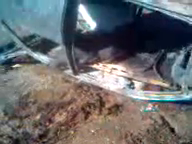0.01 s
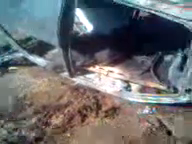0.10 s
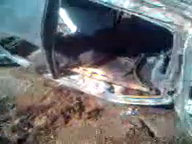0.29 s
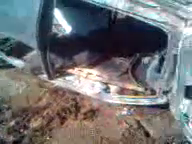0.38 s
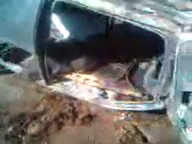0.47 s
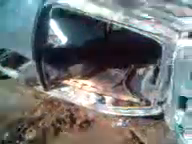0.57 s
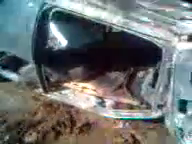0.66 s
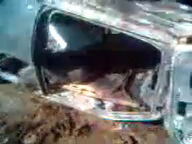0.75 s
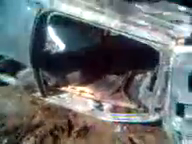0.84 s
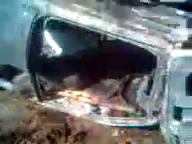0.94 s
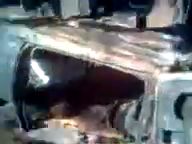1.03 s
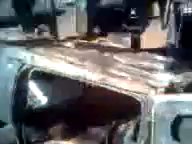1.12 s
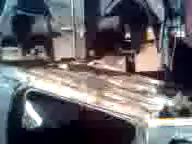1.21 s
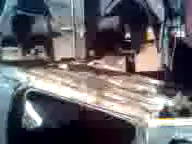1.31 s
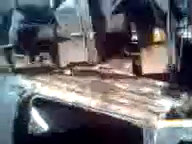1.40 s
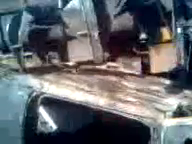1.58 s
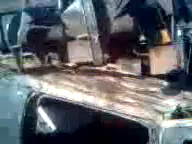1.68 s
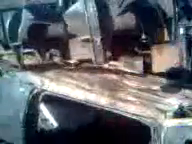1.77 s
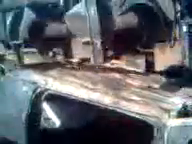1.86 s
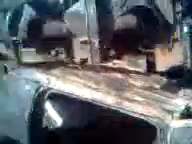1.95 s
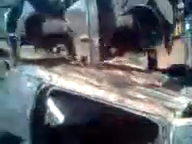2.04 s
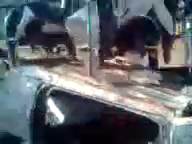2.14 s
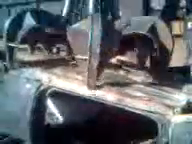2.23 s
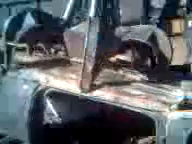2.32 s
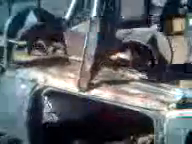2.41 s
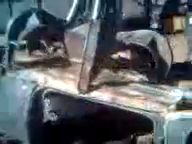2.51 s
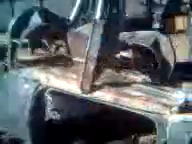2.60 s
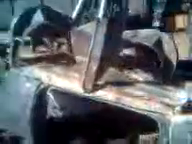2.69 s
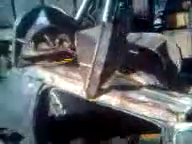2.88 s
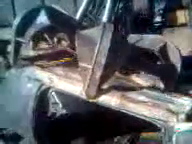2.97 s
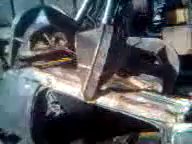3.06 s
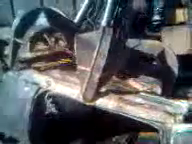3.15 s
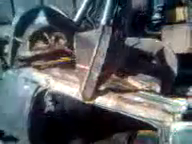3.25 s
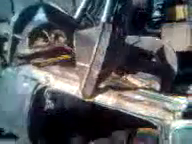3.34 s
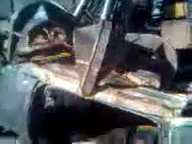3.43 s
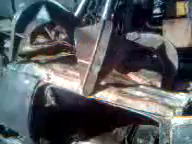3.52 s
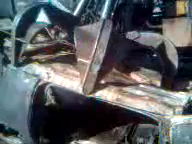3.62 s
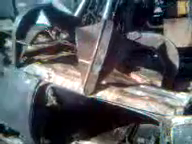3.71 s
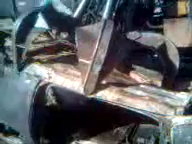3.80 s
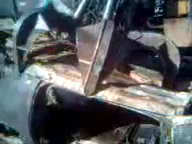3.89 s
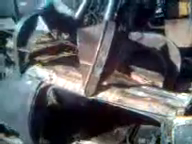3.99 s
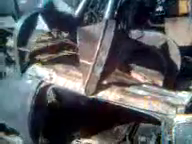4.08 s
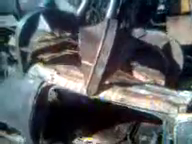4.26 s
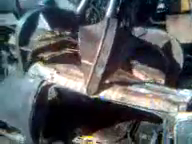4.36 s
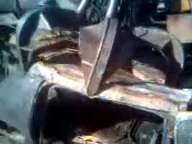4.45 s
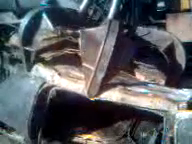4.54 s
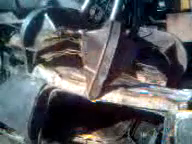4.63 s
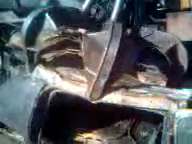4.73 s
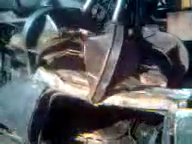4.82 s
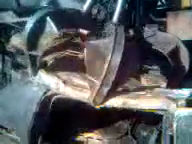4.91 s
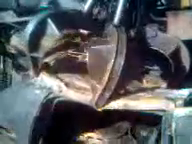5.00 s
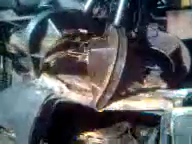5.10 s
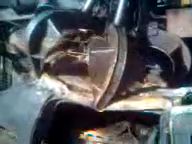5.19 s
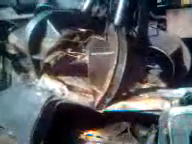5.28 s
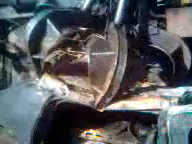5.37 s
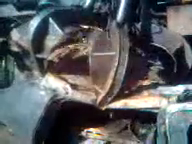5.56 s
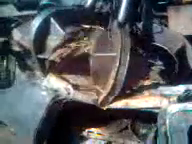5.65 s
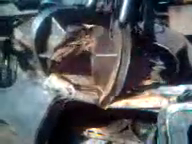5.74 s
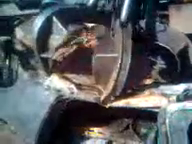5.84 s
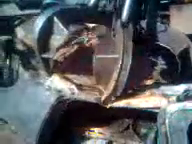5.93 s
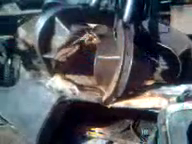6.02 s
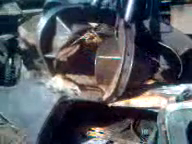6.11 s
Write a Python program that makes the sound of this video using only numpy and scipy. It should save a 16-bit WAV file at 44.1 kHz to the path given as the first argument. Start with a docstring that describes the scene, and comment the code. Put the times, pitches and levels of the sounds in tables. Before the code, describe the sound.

A diesel scrap handler drones and clatters for about a second, its note swelling with each hydraulic pull. Then its claw bites a car body: sharp cracks, gritty crumpling, short metallic squeals and hollow thuds come in uneven bursts to the end. Open scrapyard with a short scattered echo, the wreck close; a cheap, narrow-band microphone cuts the treble and flattens the loudest peaks.

```python
"""Sheet steel of a car body buckles in bursts of stick-slip impulses: cracks, crunches and dull thuds.
Each burst excites the torn sheet, the mode of its fold and the hollow hull; creases crumple between bursts.
Behind, a diesel scrap handler sums harmonics of its engine cycle with modulated rumble and clatter noise.
It drones louder at each pull of its hydraulics and speeds up a little as its claw closes; two whines wander.
The scrapyard answers with a short decaying tail; a narrow-band microphone channel clips the loudest peaks."""
import sys
import numpy as np
from scipy import signal
from scipy.fft import rfft, irfft, next_fast_len
from scipy.io import wavfile
from scipy.ndimage import uniform_filter1d, map_coordinates

SR = 44100
rng = np.random.default_rng(int(sys.argv[2]) if len(sys.argv) > 2 else 0)


def dump_mix(stems):
    """Bounce the given channels to the path in sys.argv[1] as a 16-bit WAV at rate SR."""
    frames = np.atleast_2d(stems).T  # one column per channel
    limited = np.clip(frames, -1, 1)  # hard clip at full scale
    pcm = np.round(limited * 32767).astype(np.int16)
    wavfile.write(sys.argv[1], SR, pcm)


N = 271656


def amp(db):
    """Level law: decibels to amplitude gain."""
    return 10 ** (np.asarray(db) / 20)


def unit(x):
    """Normalisation: the signal scaled to rms 1."""
    return x / np.sqrt(np.mean(x ** 2) + 1e-20)


def along(points, hz):
    """Log-frequency interpolation of (f, value) points."""
    f, value = np.transpose(points)
    return np.interp(np.log(hz + 1), np.log(f), value)


def curve(rows):
    """Linear interpolation of (t, value) rows at every sample."""
    return np.interp(np.arange(N) / SR, *np.transpose(rows))


def wobble(rate):
    """Slow random modulation: a spline through random knots, rate of them a second."""
    knots = rng.standard_normal(int(N * rate / SR) + 4)
    return map_coordinates(knots, [np.arange(N) * rate / SR])


def spells(rows, rise, fall):
    """Envelope: gain rises from each start, holds its level and falls after each end; times in s."""
    t = np.arange(N) / SR
    gain = np.zeros(N)
    for start, end, db in rows:
        rising = np.clip((t - start) / rise, 0, 1)
        falling = np.clip(1 - (t - end) / fall, 0, 1)
        gain += amp(db) * rising * falling
    return gain


def filtered(x, response):
    """Linear filtering: the spectrum multiplied by a response of frequency."""
    m = next_fast_len(len(x) + 4096)  # zero padding keeps the tail from wrapping round
    hz = np.fft.rfftfreq(m, 1 / SR)
    return irfft(rfft(x, m) * response(hz), m)[:len(x)]


def coloured(x, spectrum):
    """Spectral shaping: x weighted by the given dB curve, then set to rms 1."""
    return unit(filtered(x, lambda hz: amp(along(spectrum, hz))))


def causal(gain):
    """Minimum phase: the folded cepstrum gives this gain a response with nothing before the blow."""
    cepstrum = irfft(np.log(gain))
    half = len(cepstrum) // 2
    return np.exp(rfft(np.r_[cepstrum[0], 2 * cepstrum[1:half], np.zeros(half)]))


def resonance(hz, centre, width):
    """Damped oscillator: the frequency response of one mode."""
    damping = 1j * hz * width
    return damping / (centre ** 2 - hz ** 2 + damping)


def slips(size, rate, spread_db):
    """Stick-slip: sparse impulses of random sign and very unequal strength, rate a second."""
    happens = rng.random(size) < rate / SR
    sign = np.sign(rng.standard_normal(size))
    strength = amp(spread_db * np.clip(rng.standard_normal(size), -2, 2))
    return unit(happens * sign * strength)


# reverberation time of the yard: (f/Hz, T60/s)
YARD_T60 = [(200, 0.44), (1000, 0.24), (4000, 0.17)]


def yard(x):
    """Diffuse reverberation: stacked wrecks scatter a short tail that decays at its own rate in each band."""
    hz, t, z = signal.stft(rng.standard_normal(SR // 2), SR, nperseg=256)
    decay = amp(-60 * t / along(YARD_T60, hz)[:, None])
    tail = signal.istft(z * decay, SR, nperseg=256)[1]
    delay = np.zeros(SR // 100)  # 10 ms before the tail
    return signal.fftconvolve(x, np.r_[delay, tail / np.linalg.norm(tail)])[:N]


# thin whines over the engine: (mean f/Hz, mean peak level/dB)
WHINES = [(1120, -47.5), (1900, -46.5)]
WHINE_WANDER, WHINE_WAVER_DB = .05, 4  # share of the pitch; swing of the level


def whines():
    """Frequency and amplitude modulation: each sine drifts in pitch and comes and goes."""
    total = np.zeros(N)
    for hz, db in WHINES:
        level = amp(db + WHINE_WAVER_DB * wobble(8.8))
        pitch = hz * (1 + WHINE_WANDER * wobble(18))
        total += level * np.sin(2 * np.pi * np.cumsum(pitch) / SR)
    return total


# engine speed, opened up a little as the claw bites: (t/s, exhaust note f/Hz)
EXHAUST_NOTE = [(0.0, 229.4), (0.58, 228.9), (0.65, 232.5), (2.8, 232.6), (3.58, 234.6), (3.68, 243.3),
                (3.84, 246.7), (6.16, 246.2)]
# engine load, as rumble before its common gain: (t/s, level/dB)
LOAD = [(0.0, -45), (1.17, -46), (1.7, -39.5), (1.99, -44.5), (2.35, -35.5), (3.21, -37.5), (5.99, -38.5),
        (6.16, -43)]
# weaker engine lines before load and waver: (multiple of the four-stroke cycle rate, rms level/dB)
ORDERS = [(6, -51), (8, -47), (10, -48.5), (13, -46.5), (14, -50.5), (15, -45.5), (16, -41.5), (22, -50),
          (23, -46.5), (24, -55), (37, -54.5), (40, -52), (42, -50.5), (44, -49), (45, -51.5), (46, -48.5),
          (50, -52), (58, -48), (93, -53)]
# multiples of the cycle rate: exhaust note, fan blades, firings
NOTE_ORDER, FAN_ORDER, FIRING_ORDER = 12, 18.5, 6
# relative spectrum of the rumble: (f/Hz, level per Hz/dB)
RUMBLE = [(25, -28.5), (50, -13.5), (100, -10), (160, -3), (320, -1), (400, -8), (550, -15), (1000, -27)]
# relative spectrum of valves, injectors and gears: (f/Hz, level per Hz/dB)
CLATTER = [(250, -23), (400, -3.5), (500, -7.5), (620, -5), (880, -2), (1150, -3.5), (1400, -5), (1850, -1),
           (2150, -7), (2700, -10.5), (3400, -12), (4200, -25.5), (5500, -50.5)]
# cooling fan's blade tone: (t/s, rms level/dB)
FAN = [(0.18, -38.5), (0.3, -55.5), (0.6, -48.5), (0.75, -39), (3.3, -39.5), (6.16, -41.5)]
# the exhaust note swells as the hydraulics draw power; adds to the idle in power: (start t/s, end t/s, level/dB)
PULLS = [(-0.04, 0.13, -34.5), (0.24, 0.57, -29), (0.7, 1.15, -29), (1.3, 1.45, -31), (1.48, 1.87, -25.5),
         (1.92, 2.2, -27.5), (2.22, 2.72, -25), (2.8, 2.95, -35), (3.15, 3.44, -27), (3.52, 4.05, -27.5),
         (4.16, 6.16, -31)]
PULL_RISE_S, PULL_FALL_S = 0.073, 0.13


def engine(idle_db=-47, waver_db=2.0, drift=.08, rumble_db=6.5, clatter_db=-33.0, repeat=0.37,
           load_share=0.61, beat_db=1.1, lope_db=1, flutter_db=1.83):
    """Harmonic order: exhaust lines, fan and noise modulation all follow the crankshaft's cycle."""
    cycles = np.cumsum(curve(EXHAUST_NOTE)) / SR / NOTE_ORDER
    angle = 2 * np.pi * cycles
    load = curve(LOAD)

    def tone(order, stray):
        """Phase modulation: a sine of rms 1 at one order, straying by a share of its period."""
        phase = 2 * np.pi * (rng.random() + stray * wobble(7))
        return np.sqrt(2) * np.sin(order * angle + phase)

    drone = np.hypot(amp(idle_db), spells(PULLS, PULL_RISE_S, PULL_FALL_S))
    note = drone * amp(flutter_db * wobble(14)) * tone(NOTE_ORDER, .01)
    fan = amp(curve(FAN)) * tone(FAN_ORDER, 0.042)
    # unequal cylinders fill in the other multiples of the cycle rate; a faint pump whine sits at the 93rd
    lines = sum(amp(db + waver_db * wobble(5)) * tone(round(order), drift) for order, db in ORDERS)

    # valves and injectors partly repeat the same rattle in every cycle
    pattern = rng.standard_normal(round(N / cycles[-1]))
    repeated = pattern[(cycles % 1 * len(pattern)).astype(int)]
    rattle = np.sqrt(repeat) * repeated + np.sqrt(1 - repeat) * rng.standard_normal(N)
    # the noise swells at each firing and lopes once a cycle
    firing_swell = beat_db * np.cos(FIRING_ORDER * angle)
    cycle_lope = lope_db * np.cos(angle)
    beat = amp(firing_swell + cycle_lope + 0.95 * wobble(14))
    clatter = coloured(beat * rattle, CLATTER)
    rumble = amp(load + rumble_db) * coloured(beat * rng.standard_normal(N), RUMBLE)

    effort = amp(load_share * (load - load.mean()))
    return note + fan + rumble + effort * (lines + amp(clatter_db) * clatter)


# the claw squeezes and the steel crumples, before gain and surge: (start t/s, end t/s, level/dB)
SQUEEZES = [(1.26, 1.55, -32), (1.55, 1.8, -44), (1.92, 2.1, -30), (2.1, 2.45, -24.5), (2.62, 2.83, -28),
            (2.96, 3.05, -29.5), (3.48, 4.05, -27.5), (4.15, 4.22, -27), (4.35, 4.47, -27.5),
            (4.52, 4.92, -28), (4.95, 5.32, -38), (5.33, 5.83, -32.5), (5.85, 6.11, -27)]
SQUEEZE_RISE_S, SQUEEZE_FALL_S = 0.039, 0.08
# relative spectrum of running creases: (f/Hz, level per Hz/dB)
CREASE = [(150, -29), (300, 1.5), (550, -6.5), (850, 0.5), (1400, -3.5), (2100, -1), (2800, -6),
          (3500, -7.5), (5000, -31)]
# creases keep running after a buckle: level against its table level, decay time
SETTLE_DB, SETTLE_T60_S = -15, .5


def crumple(level_db=0.5, clump_db=2.5, patch_db=6.0, surge_db=1.5):
    """Crackling noise: creases run in clumps, under each squeeze and after each buckle."""
    grains = slips(N, rate=3000, spread_db=6.0) * amp(clump_db * wobble(55))
    # each patch of metal has its own colour: smoothed random gains over time and frequency
    z = signal.stft(grains, nperseg=1024)[2]
    patches = uniform_filter1d(rng.standard_normal(z.shape), size=5, axis=0)
    patches = uniform_filter1d(patches, size=4, axis=1)
    grains = signal.istft(z * amp(patch_db * unit(patches)), nperseg=1024)[1][:N]

    t = np.arange(N) / SR
    pressing = spells(SQUEEZES, SQUEEZE_RISE_S, SQUEEZE_FALL_S) * amp(level_db + surge_db * wobble(14))
    settling_power = np.zeros(N)
    for start, _, db, *_ in BUCKLES:
        decay_db = -60 * np.abs(t - start) / SETTLE_T60_S
        settling_power += (t > start) * amp(db + SETTLE_DB + decay_db) ** 2
    return np.hypot(pressing, np.sqrt(settling_power)) * coloured(grains, CREASE)


# panels giving way; a bending panel rings, a tearing one crackles; level before length and common gain:
# (t/s, length/s, level/dB, pitch of the fold f/Hz, ring over crackle level/dB)
BUCKLES = [(1.368, 0.028, -25.5, 986, 0.5), (1.39, 0.035, -22, 2194, -2), (1.472, 0.022, -14, 2284, 3.5),
           (1.491, 0.028, -20, 1300, -3), (2.028, 0.033, -25, 2227, 9.5), (2.102, 0.017, -20.5, 927, -2.5),
           (2.124, 0.021, -9.5, 731, 4), (2.159, .032, -12.5, 833, 0), (2.199, .021, -13, 798, -5.5),
           (2.225, 0.028, -13, 2350, -1.5), (2.258, 0.02, -18, 840, -2.5), (2.299, .04, -22, 1980, -2),
           (2.346, 0.013, -13, 2530, 16.5), (2.4, 0.032, -21.5, 1813, -1.5), (2.61, 0.023, -21, 3600, -14),
           (2.674, 0.04, -15, 2300, -23.5), (2.736, 0.025, -19, 784, 1.5), (2.764, 0.022, -13.5, 995, -7),
           (2.81, .034, -24.5, 468, 9.5), (2.908, .025, -22, 920, 9.5), (2.977, 0.025, -14, 1990, 0),
           (3.149, 0.0072, -10.5, 2328, 0), (3.163, 0.014, -16.5, 728, -4.5),
           (3.534, 0.021, -22.5, 1005, 5.5), (3.617, 0.024, -24, 341, 2), (3.645, 0.014, -18.5, 2035, 2),
           (3.747, 0.028, -25, 1284, -9), (3.868, 0.019, -23.5, 170.5, 14), (3.943, 0.015, -18.5, 2200, 6),
           (3.969, 0.032, -22.5, 2033, 3), (4.128, .02, -8, 1280, -1), (4.357, 0.015, -19.5, 3450, 4),
           (4.375, 0.013, -14, 3490, -5.5), (4.42, 0.018, -20.5, 3230, -7), (4.527, 0.024, -22.5, 1797, 16),
           (4.591, .029, -16, 228, 2), (4.619, 0.028, -11, 639, 2.5), (4.639, 0.02, -17, 1001, 7),
           (4.717, 0.0051, -9, 2342, -3), (4.745, 0.019, -9, 2250, -5), (4.833, 0.013, -14, 1123, 10.5),
           (4.859, .02, -10, 1625, 6), (5.124, 0.016, -17.5, 1348, -1.5), (5.387, .026, -9.5, 746.4, 0),
           (5.438, 0.0096, -19, 2010, 6), (5.586, .011, -15.5, 290, 11), (5.871, 0.013, -24, 191, 10),
           (5.899, 0.0043, -5.5, 2180, -8), (5.928, 0.0086, -14, 2360, -8.5),
           (6.027, 0.019, -13, 1975, 9.5), (6.061, .006, -18.5, 2064, 0.5), (6.076, .012, -9, 2295, -6.5)]
# relative spectrum of torn steel before its treble slope: (f/Hz, level per Hz/dB)
SHEET = [(100, -30.5), (300, -3.5), (700, 5), (1400, 1.5), (2400, 3), (3500, -6.5), (5000, -4)]
# relative spectrum of the hollow car body: (f/Hz, level per Hz/dB)
HULL = [(40, -29.5), (150, -5), (300, 1), (450, -4.5), (900, -25.5), (3000, -59.5)]
FOLD_HZ = 1500  # reference pitch for the thump and the treble slope
# the hull's thump at FOLD_HZ, against the whole panel, crackle and ring together; wide, low folds thump more
THUD_DB, THUD_DB_PER_OCTAVE = -16.5, -3
# treble slope of the crackle, dB per octave: the more a panel tears, the brighter
TILT_DB_PER_OCTAVE, TILT_PER_RING_DB = -.5, -0.6


def buckles(attack=0.0017, sag_db=3, t60=0.069, ring_width_hz=50, ring_loss=0.12, squeal=0.25, wander=.06,
            dent_gain=1.76, dent_width_hz=90, size=8192, count=7):
    """Modal excitation: a run of slips crackles the sheet, rings its fold and thumps the hollow body."""
    out = np.zeros(N + 2 * size)
    t = np.arange(size) / SR
    hz = np.fft.rfftfreq(size, 1 / SR)
    hull = causal(amp(along(HULL, hz)))
    for start, length, db, ring_hz, ring_db in BUCKLES:
        # the force builds up, sags over the run, then dies away
        sag = -sag_db * np.minimum(t / length, 1)
        release = -60 * np.maximum(t - length, 0) / t60
        force = (1 - np.exp(-t / attack)) * amp(sag + release)

        def excite(body):
            """Source and filter: a fresh run of slips drives a body's response."""
            run = force * slips(size, rate=6000, spread_db=4.0)
            return unit(irfft(rfft(run) * body))

        # every dent has a few short modes of its own
        centres = rng.uniform(500, 3600, count)
        dents = 1 + dent_gain * sum(resonance(hz, centre, dent_width_hz) for centre in centres)
        brightness = TILT_DB_PER_OCTAVE + TILT_PER_RING_DB * ring_db
        tilt = brightness * np.log2(np.clip(hz, 100, 5000) / FOLD_HZ)
        sheet = causal(amp(along(SHEET, hz) + tilt))

        # part of the slips lock to the fold's mode: a brief squeal whose pitch wanders as the steel bends
        pitch = ring_hz * (1 + wander * np.interp(t, t[::size // 32], rng.standard_normal(32)))
        locked = unit(force * np.sin(2 * np.pi * np.cumsum(pitch) / SR))
        loose = excite(resonance(hz, ring_hz, ring_width_hz + ring_loss * ring_hz))
        ring = np.sqrt(squeal) * locked + np.sqrt(1 - squeal) * loose

        panel = unit(excite(sheet * dents) + amp(ring_db) * unit(ring))
        thud = amp(THUD_DB + THUD_DB_PER_OCTAVE * np.log2(ring_hz / FOLD_HZ)) * excite(hull)
        # a longer run of slips releases more energy
        energy = np.sqrt(length * SR / size)
        out[int(start * SR):][:size] += amp(db) * (panel + thud) * energy
    return out[:N]


def scene(buckle_db=1.12, yard_db=-11):
    """Superposition: the machine behind, the tearing car close by and its reverberation."""
    cracks = amp(buckle_db) * buckles()
    answer = amp(yard_db) * yard(cracks)
    return (whines() + engine() + answer + crumple() + cracks)[None]


def record(dry, band_hz=3720, ceiling=0.7, top_hz=15900):
    """Band limiting and clipping: a telephone-band microphone channel flattens its peaks."""
    def band(hz):
        """Low-pass: a steep edge at band_hz and a steeper one at 4480 Hz."""
        return (1 + (hz / band_hz) ** 28) ** -.5 / (1 + (hz / 4480) ** 60)

    narrow = filtered(dry[0], band)
    clipped = np.clip(narrow, -ceiling, ceiling)
    return filtered(clipped, lambda hz: hz < top_hz)[None]


dry = scene()
out = record(dry)
dump_mix(out)
```